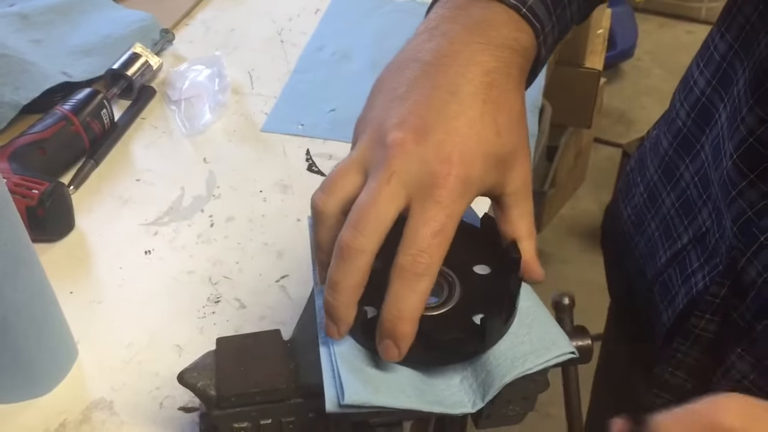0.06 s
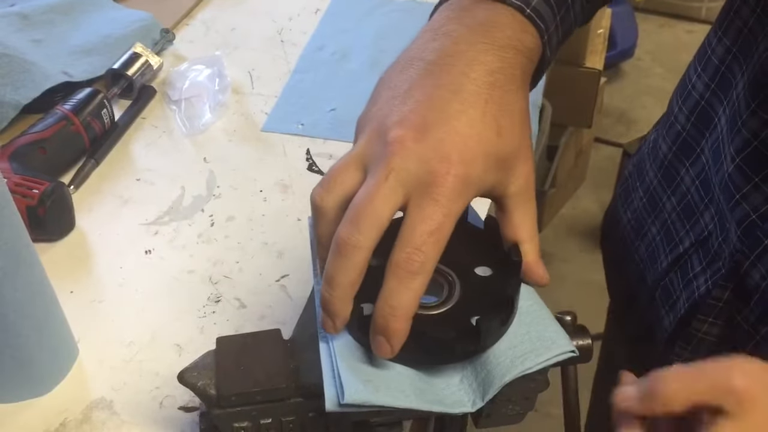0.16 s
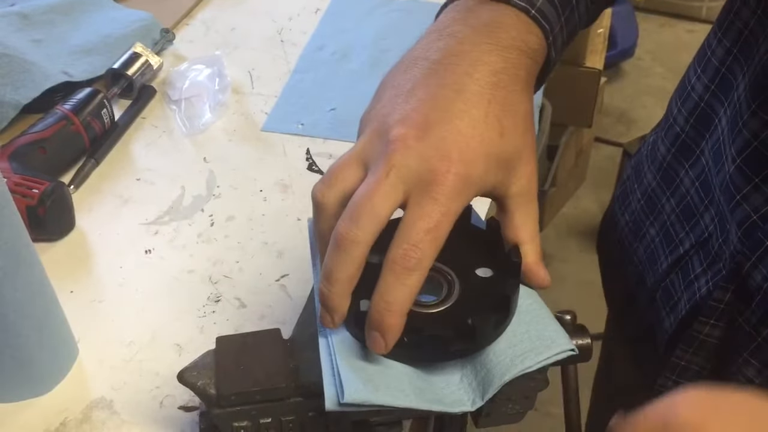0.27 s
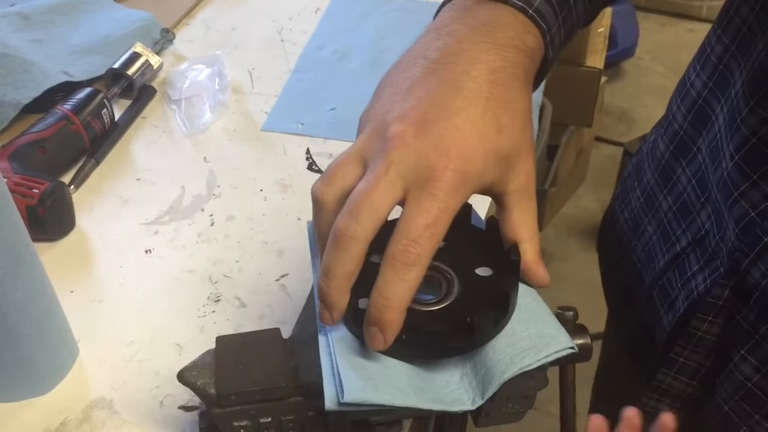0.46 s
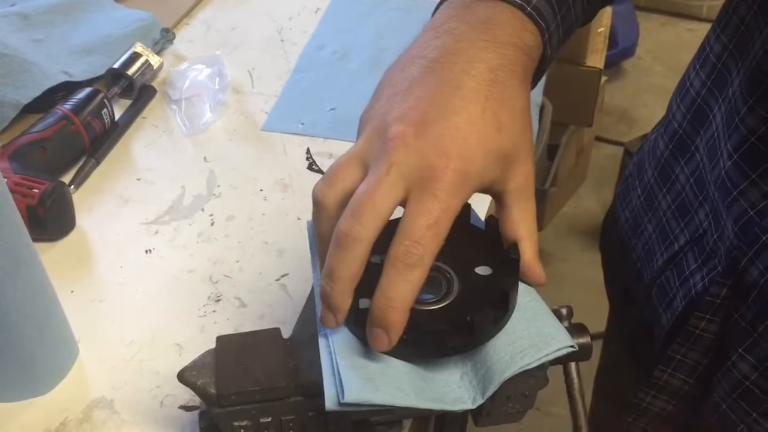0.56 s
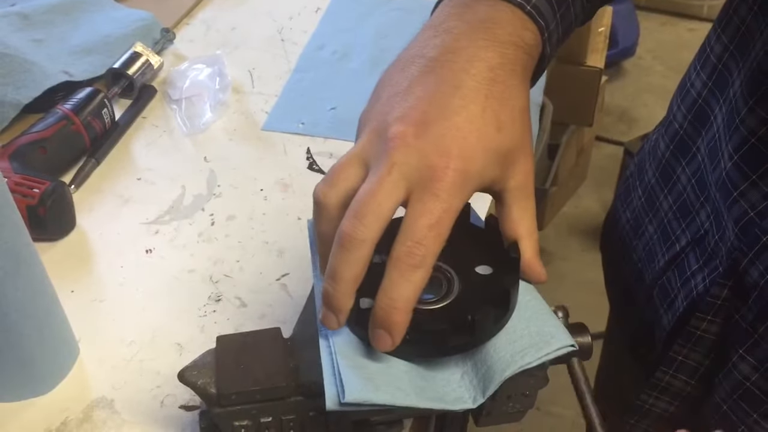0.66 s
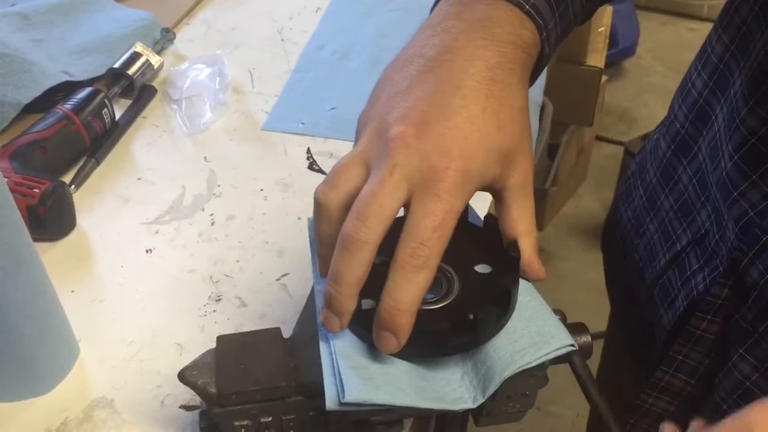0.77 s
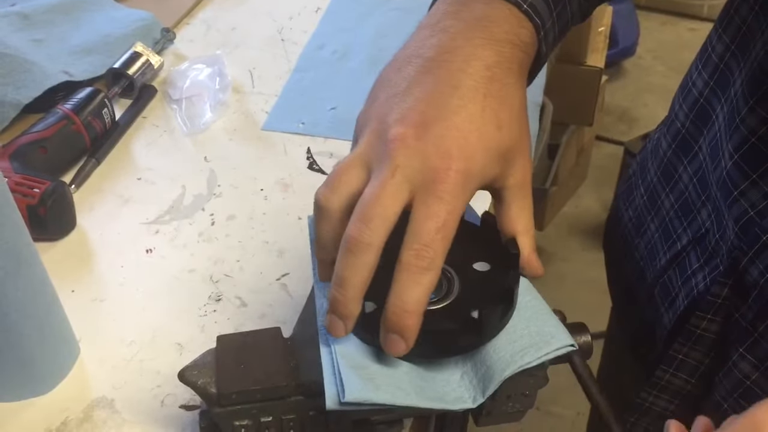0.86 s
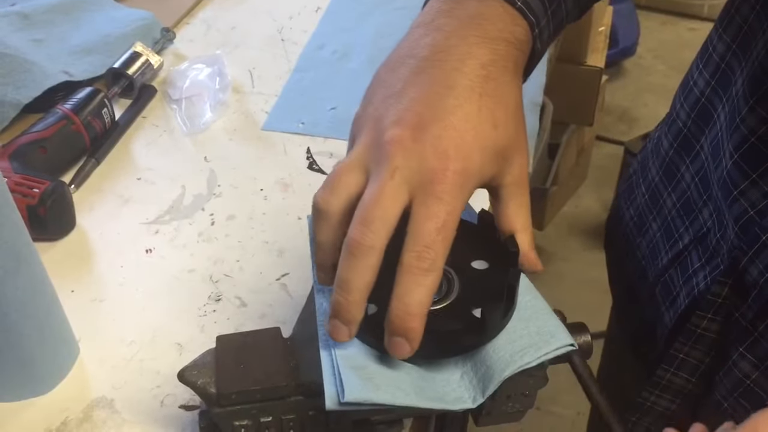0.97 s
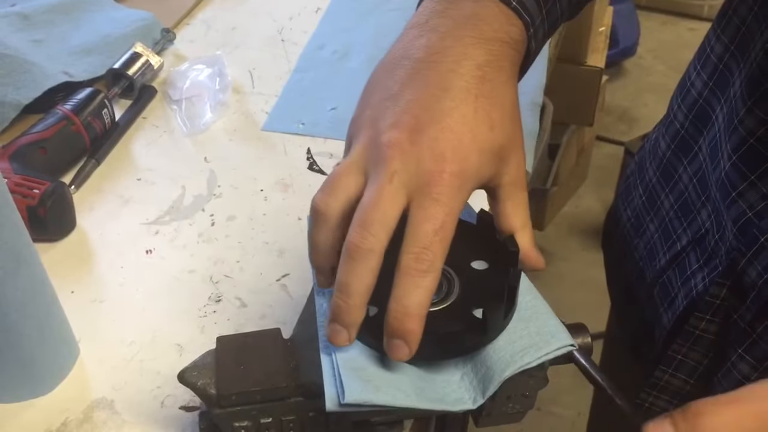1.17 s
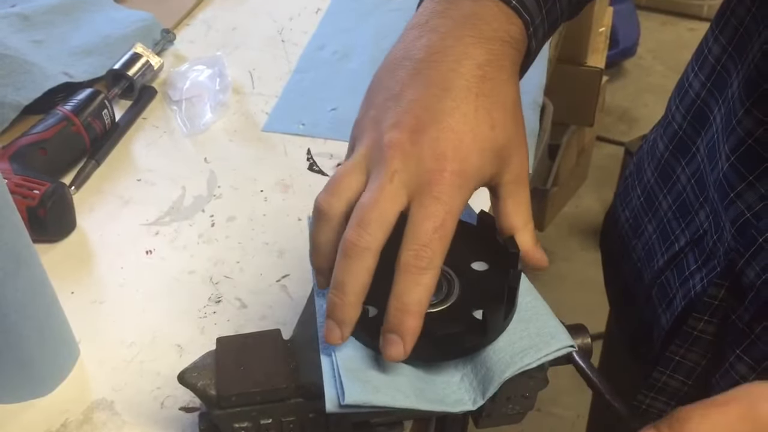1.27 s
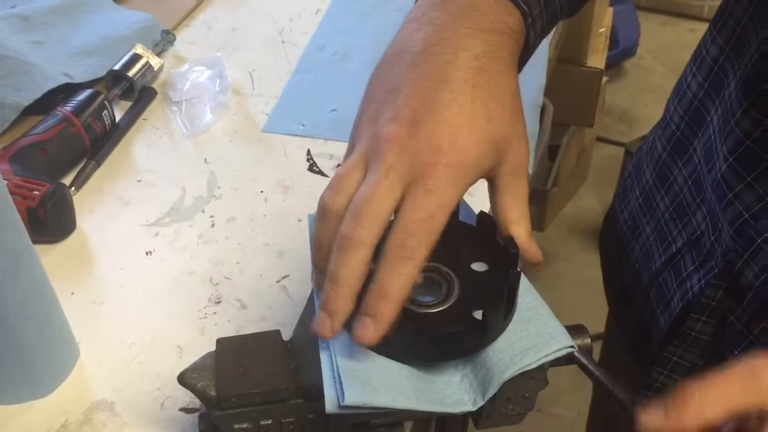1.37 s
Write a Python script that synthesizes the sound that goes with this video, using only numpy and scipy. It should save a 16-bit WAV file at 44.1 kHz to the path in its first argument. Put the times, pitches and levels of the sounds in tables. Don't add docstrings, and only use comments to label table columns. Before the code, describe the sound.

A bench vise's steel handle slides and knocks. A previous knock's echo fades over low rumble and faint hiss; around 0.2 s light clicks and scraping build to a loud, bright clack at 0.3 s with a bench thud. After a short lull, a second clank and rattle at 0.6 s settles. Faint ticks follow, then a soft hand brush near 1.04 s. Small workshop, brief reverb, close camera microphone.

```python
import sys
import numpy as np
from scipy import signal
from scipy.fft import rfft, irfft, next_fast_len
from scipy.io import wavfile

SR = 44100
rng = np.random.default_rng(int(sys.argv[2]) if len(sys.argv) > 2 else 0)


def put_to_file(sound):
    columns = np.atleast_2d(sound).T
    safe = np.clip(columns, -1, 1)
    whole_steps = np.round(safe * 32767)
    wavfile.write(sys.argv[1], SR, whole_steps.astype(np.int16))


def nominal_scale(level):
    x = np.asarray(level, float) / 20
    return 10 ** x


N = 61739


def unit(x):
    return x / np.sqrt(np.mean(x ** 2) + 1e-20)


def along(points, hz):
    f, v = np.transpose(points)
    return np.interp(np.log(hz + 1), np.log(f + 1), v)


def level(rows):
    s, db = np.transpose(rows)
    return nominal_scale(np.interp(np.arange(N) / SR, s, db))


def filtered(x, response):
    m = next_fast_len(N + SR // 2)
    return irfft(rfft(x, m) * response(np.fft.rfftfreq(m, 1 / SR)), m)[..., :N]


def coloured(x, tone):
    return unit(filtered(x, lambda hz: nominal_scale(along(tone, hz))))


def noise(tone):
    closed = [(tone[0][0] / 2, -120)] + list(tone)
    return coloured(rng.standard_normal(N), closed)


def resonant(x, peaks):
    def response(f):
        total = 0
        for k, (centre, width, db) in enumerate(peaks):
            total = total + (-1) ** k * nominal_scale(db) * 1j * f * width / (centre ** 2 - f ** 2 + 1j * f * width)
        return total
    return filtered(x, response)


def decay(db, t, t60):
    return nominal_scale(db - 60 * t / t60)


def sine(hz, t):
    return np.sin(2 * np.pi * hz * t)


def add(track, s, sound):
    part = track[max(round(s * SR), 0):][:len(sound)]
    part += sound[:len(part)]


# (frequency [Hz], level [dB])
HISS_TONE = [(59, -21), (100, -4), (114, -11.5), (193, -9), (224, -11), (260, -9.5), (461, -21.5),
             (1520, -26), (15800, -39), (16000, -78.5)]


def hiss():
    return nominal_scale(-70.5) * noise(HISS_TONE)


# (time [s], level [dB])
ECHO_LEVEL = [(0, -54.5), (.1, -58), (.17, -75.5), (.3, -100)]
# (frequency [Hz], level [dB])
ECHO_TONE = [(71, -35.5), (120, -5.5), (167, 0.5), (524, -19), (892, -29.5), (988, -32), (2290, -34),
             (15900, -63)]


def fading_echo():
    return level(ECHO_LEVEL) * noise(ECHO_TONE)


# (time [s], level [dB])
RUMBLE_LEVEL = [(0, -55), (.17, -63.5), (.29, -59.5), (.5, -56.5), (.57, -67.5), (.76, -60.5), (.8, -72),
                (1.4, -69.5)]
# (frequency [Hz], level [dB])
RUMBLE_COLOUR = [(15, -44), (25, -10), (37, -5.5), (64, -10.5), (87, 2.5), (108, -8), (134, -27.5),
                 (151, -49), (250, -22), (320, -33.5), (550, -120)]


def rumble():
    return level(RUMBLE_LEVEL) * noise(RUMBLE_COLOUR)


# (time [s], level [dB])
BRUSH_LEVEL = [(1.015, -90), (1.035, -72), (1.046, -70.5), (1.062, -99)]
# (frequency [Hz], level [dB])
BRUSH_TONE = [(200, -46.5), (500, 0.5), (1500, -6.5), (3500, -13), (8000, -32.5), (12000, -67.5)]


def brushing_hand():
    return level(BRUSH_LEVEL) * noise(BRUSH_TONE)


# (frequency [Hz], t60 [s])
ROOM_T60 = [(100, 0.65), (300, 0.21), (1000, 0.39), (4000, 0.23), (8000, 0.26), (15000, 0.11)]


def room(x):
    hz, t, z = signal.stft(rng.standard_normal(SR // 2), SR, nperseg=256)
    dying = z * decay(0, t, along(ROOM_T60, hz)[:, None])
    tail = signal.istft(dying, SR, nperseg=256)[1]
    late = np.pad(x, (round(0.004 * SR), 0))
    return signal.fftconvolve(late, tail / np.linalg.norm(tail))[:N]


# (time [s], level [dB])
RATTLE_LEVEL = [(.20, -76), (.225, -52.5), (.245, -55.5), (.27, -57), (.30, -59), (.315, -39), (.36, -51),
                (.42, -73), (.45, -100), (.60, -100), (.615, -47), (.64, -43), (.70, -58.5), (.76, -71.5),
                (.83, -71.5), (.88, -77.5), (.93, -100)]
# (frequency [Hz], level [dB])
RATTLE_COLOUR = [(150, -18), (260, 6.5), (450, -2), (750, -2.5), (1300, -8), (2200, -13), (3500, -26.5),
                 (6000, -48.5)]


def rattle():
    hops = rng.random(N) < 900 / SR
    grains = hops * rng.standard_normal(N) + 0.15 * rng.standard_normal(N)
    closed = [(60, -120)] + RATTLE_COLOUR + [(9000, -120)]
    return level(RATTLE_LEVEL) * coloured(grains, closed)


BLOW_TIMES = [.178, .222, .235, .284, .307, .312, .360, .611, .618, .626, .66, 1.034, 1.053, 1.074, 1.088,
              1.145, 1.245, .002, .050, .085, .42, .209, .250, .264, .700, .738, .850, 1.158, .392, .632,
              .645, .682, .664, .705, .418, .425]
# (level [dB], centre [Hz], reach [octaves], ring time factor)
BLOWS = [(-42.5, 209, 0.37, 0.91), (-34.5, 266, 0.75, 0.33), (-37.5, 260, .6, 1.2), (-30, 290, 0.28, 1),
         (-28.5, 265, 0.52, 0.95), (-33, 1080, 1.1, 1.43), (-37, 183, 0.56, 0.43), (-31, 1600, 1.02, 1.46),
         (-21.5, 518, 0.455, 0.87), (-30.5, 366, 0.65, 0.88), (-36.5, 190, 0.16, 0.92),
         (-54, 452, 0.33, 1.82), (-43.5, 127, 0.45, 1.2), (-50.5, 122, 0.3, 1.52), (-50, 157, 0.49, 0.26),
         (-55, 33, 1.1, 0.86), (-61, 95, 0.42, .9), (-50.5, 180, 1.38, 1.93), (-43.5, 130, 0.39, 0.33),
         (-48.5, 116, 0.37, 1.9), (-47, 88, 0.21, 2.2), (-42.5, 410, 0.85, 1), (-39.5, 300, 0.98, 0.71),
         (-40, 212, 0.43, 0.697), (-46.5, 230, 1.2, 0.89), (-51, 150, 0.57, 0.88), (-55, 780, 0.17, 1.3),
         (-49.5, 140, 0.35, 0.41), (-44, 194.7, .5, 0.76), (-33, 810, 0.16, 0.87), (-44, 420, 0.49, 1),
         (-45, 210, 0.7, .8), (-49, 240, 0.44, 1), (-47, 380, 0.49, 1.1), (-49, 267, .4, 0.74),
         (-47.5, 190, .3, .6)]
# (frequency [Hz], level [dB], t60 [s])
BENCH_MODES = [(93, -1, 0.28), (145, 1, 0.092), (185.6, -3.5, 0.21), (256.3, -1, 0.14), (291, -6.5, 0.1),
               (340.9, 0, 0.11), (372.7, -6.5, 0.093), (442, -10, 0.044), (512, 1, 0.046),
               (660, -1.5, 0.032), (727.6, -3, 0.063), (945, -13, 0.02), (1405, -9, 0.022),
               (1873, -6.5, 0.029)]
SCATTER_DB, DETUNE = 1, 0.008
SOFT_S = 0.0017
BENCH_ROOM_DB = -9


def bench():
    out, t = np.zeros(N), np.arange(SR // 3) / SR
    for s, (db, centre_hz, reach, ring_x) in zip(BLOW_TIMES, BLOWS):
        ring = np.zeros(len(t))
        for hz, mode_db, t60 in BENCH_MODES:
            level_luck, pitch_luck = rng.standard_normal(2)
            octaves = np.log2(hz / centre_hz)
            struck_db = mode_db + SCATTER_DB * level_luck - 7.14 * (octaves / reach) ** 2
            ring += decay(struck_db, t, t60 * ring_x) * sine(hz * (1 + DETUNE * pitch_luck), t)
        thud = nominal_scale(db - 2.5) * ring * (1 - np.exp(-t / SOFT_S))
        thud = np.pad(thud, (0, len(t)))
        add(out, s, thud + nominal_scale(BENCH_ROOM_DB) * room(thud)[:len(thud)])
    return out


TICK_TIMES = [.5648, .762, .777, .9855, .416, .263, .600, .612, .302, .2155, .2225]
# (level [dB], frequency [Hz], t60 [s])
TICK_MODES = [
    [(-61, 6600, .006)],
    [(-55, 1310, .035)],
    [(-57, 1360, .025)],
    [(-53.5, 1750, .011), (-54, 3000, .008), (-57, 4700, .005), (-60, 5900, .004), (-60, 2400, .004),
     (-61, 13000, .004)],
    [(-53, 1500, .006), (-55, 1850, .008), (-55, 700, .025)],
    [(-46, 1515, .13)],
    [(-41, 2050, .035), (-57, 14500, .035), (-51, 10000, .035)],
    [(-59, 14400, .04), (-45, 6050, .04), (-48, 6350, .06)],
    [(-43, 3063, .065), (-43, 3226, .06), (-44, 3381, .05), (-40, 3615, .05), (-42, 1880, .07),
     (-46, 5800, .14), (-47, 5960, .14), (-49, 6120, .12)],
    [(-43, 3000, .02)],
    [(-42, 3400, .025), (-50, 12000, .025)],
]


def ticks():
    out, t = np.zeros(N), np.arange(SR // 10) / SR
    for s, modes in zip(TICK_TIMES, TICK_MODES):
        for db, hz, t60 in modes:
            add(out, s, decay(db, t, t60) * sine(hz, t))
    return out


# (time [s], level [dB], lowest frequency [Hz])
STEEL_SNAPS = [
    (.5648, -57.5, 5400),
    (.6000, -41.5, 1400),
    (0.67, -52.5, 6000),
    (.3016, -22.5, 1600),
    (.2945, -41.5, 10000),
    (0.23, -49, 5000),
    (.2215, -48.5, 4700),
    (.2120, -50.5, 6000),
    (0.84, -59.5, 2300),
]


def snaps():
    out, t = np.zeros(N), np.arange(SR // 100) / SR
    dull = signal.butter(2, 13500, fs=SR, output="sos")
    gap = signal.butter(1, (7300, 8800), "bandstop", fs=SR, output="sos")
    for s, db, low_hz in STEEL_SNAPS:
        burst = decay(db, t, 0.0016) * rng.choice([-1, 1], len(t))
        thin = signal.butter(3, low_hz, "high", fs=SR, output="sos")
        add(out, s, signal.sosfilt(np.vstack([dull, gap, thin]), burst))
    return out


# (frequency [Hz], width [Hz], level [dB])
IRON_MODES = [(890, 770, -5), (1490, 110, -0.5), (1925, 360, -2), (2340, 416, 2), (2916, 820, -2),
              (3690, 170, 3), (4350, 1640, -6.5), (5900, 695, -3), (6410, 403, 0), (9660, 190, -4.5),
              (11250, 490, 1), (14770, 900, -23)]
IRON_TOP_HZ = 7300


def iron(x):
    return filtered(resonant(x, IRON_MODES), lambda f: 1 / (1 + 1j * f / IRON_TOP_HZ))


# (time [s], level [dB])
SLIDE_PRESSURE = [(.170, -110), (.190, -69.5), (.205, -63), (.216, -46.5), (.224, -42.5), (.236, -55.5),
                  (.262, -54), (.280, -49.5), (.298, -39.5), (.310, -37.5), (.345, -110)]
# (time [s], level [dB])
SETTLE_PRESSURE = [
    (.580, -110),
    (.590, -79),
    (.599, -64),
    (.612, -40.5),
    (.625, -44.5),
    (.650, -104),
    (.67, -110),
]
# (time [s], level [dB])
SING_LEVEL = [(.584, -100), (.591, -68), (.600, -54), (.615, -52), (.628, -55), (.66, -100)]
# (frequency [Hz], width [Hz], level [dB])
SQUEAL_MODES = [(5620, 44, -20), (11070, 110, -16)]
GRAIN_RATE, GRAIN_DB = 9000, 2
SLIDE_TOP_HZ = 6460


def slide():
    catches = rng.random(N) < GRAIN_RATE / SR
    grains = catches * nominal_scale(GRAIN_DB * rng.exponential(size=N)) * rng.standard_normal(N)
    squeal = np.zeros(N)
    for hz, width, db in SQUEAL_MODES:
        narrow = resonant(grains, [(hz, width, 0)])
        squeal += nominal_scale(db) * unit(resonant(narrow, [(hz, 8 * width, 0)]))
    scrape = unit(filtered(iron(grains), lambda f: 1 / (1 + (f / SLIDE_TOP_HZ) ** 6)))
    sliding = level(SLIDE_PRESSURE) * (scrape + squeal)
    return sliding + level(SETTLE_PRESSURE) * scrape + level(SING_LEVEL) * squeal


CONTACT_TIMES = [.2068, .2120, .2150, .2215, .2785, .2890, .2945, .3016, .3065, .6000, .6095, .6150]
FREE_TIMES = [.005, .003, .007, .004, .005, .005, .005, .003, .008, .0095, .013, .008]
# (low ring level [dB], high ring level [dB], iron crack level [dB])
CONTACT_LEVELS = [(-44, -64, -62), (-45.5, -65, -56.5), (-38.5, -43.5, -68), (-49.5, -54, -47),
                  (-61.5, -74, -54), (-47, -72, -53), (-37.5, -52, -42.5), (-22.5, -29.5, -27),
                  (-38.5, -34, -38), (-34, -32.5, -44.5), (-70, -67, -33.5), (-39.5, -60, -45.5)]
# (frequency [Hz], level [dB], t60 [s])
BAR_MODES = [(5635, -2, 0.22), (5840, -16, 0.027), (11020, -5, 0.081)]
# (frequency [Hz], level [dB], t60 [s])
PART_MODES = [(6150, -54, .18), (6260, -54, .2), (6510, -54, .15), (6850, -39, .02), (10040, -59, .13),
              (9930, -63, .1)]
PART_S = 0.610
GRIP_DB, GRIP_S = -34, 0.00029
CRACK_S, CLICK_DB, IRON_DB = 0.02, -1, 10.5


def handle():
    bar, burst, t = np.zeros(N), np.zeros(N), np.arange(SR // 4) / SR
    for s, free_s, (low_db, high_db, crack_db) in zip(CONTACT_TIMES, FREE_TIMES, CONTACT_LEVELS):
        grip = nominal_scale(GRIP_DB * np.clip((t - free_s) / GRIP_S, 0, 1))
        onset = 1 - np.exp(-t / 0.0008)
        for hz, mode_db, t60 in BAR_MODES:
            hit_db = high_db if hz > IRON_TOP_HZ else low_db
            add(bar, s, grip * onset * decay(mode_db + hit_db, t, t60) * sine(hz, t))
        crack = decay(0, t, CRACK_S) * rng.standard_normal(len(t))
        crack[0] += nominal_scale(CLICK_DB)
        add(burst, s, nominal_scale(crack_db) * crack)
    for hz, db, t60 in PART_MODES:
        add(bar, PART_S, decay(db, t, t60) * sine(hz, t))
    return bar + nominal_scale(IRON_DB) * iron(burst)


# (time [s], level [dB])
HUSH_LEVEL = [(.445, 0.5), (.465, -8.5), (.55, -11), (.56, 0.5), (.74, -4.5), (.79, 0), (.95, -10),
              (.98, -2)]
ROOM_DB = -13.5


def scene():
    background = hiss() + fading_echo() + rumble() + brushing_hand()
    steel = ticks() + snaps() + slide() + handle()
    early = np.arange(N) < SR // 2
    wet = nominal_scale(ROOM_DB) * (room(steel * early) + room(steel * ~early))
    near = steel + bench() + rattle() + wet
    return (level(HUSH_LEVEL) * near + background)[None]


def band_limit(x):
    return signal.sosfilt(signal.butter(12, 16640, fs=SR, output="sos"), x)


# (frequency [Hz], level [dB])
MIC_TONE = [(25, -16.5), (45, 0), (10000, 3), (14000, 0.5), (15800, 3.5), (16600, -14)]
TOP_HZ = 16640


def record(dry):
    mix = filtered(dry, lambda hz: nominal_scale(along(MIC_TONE, hz)) * (hz < TOP_HZ))
    return band_limit(mix)


dry = scene()
out = record(dry)
put_to_file(out)
```